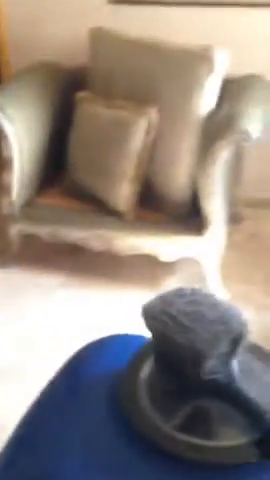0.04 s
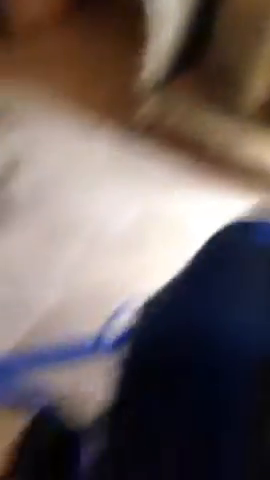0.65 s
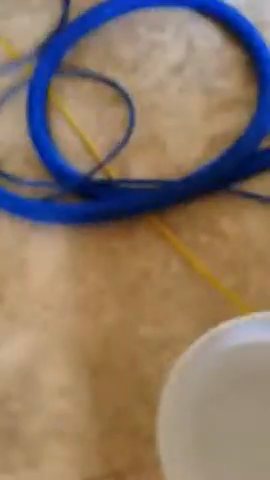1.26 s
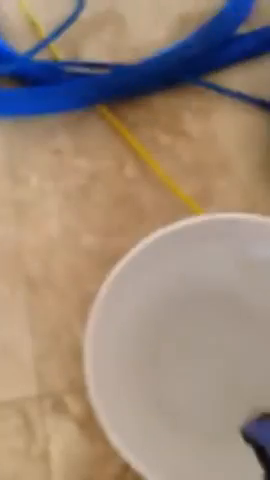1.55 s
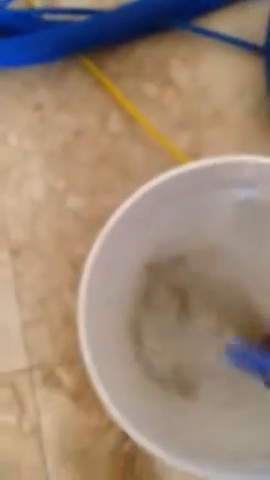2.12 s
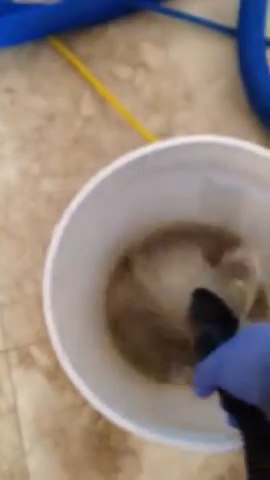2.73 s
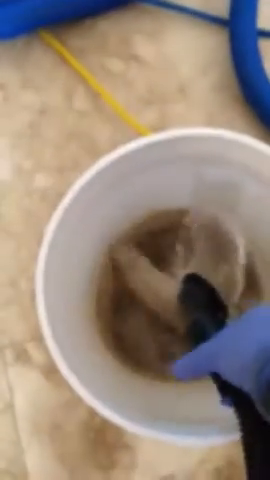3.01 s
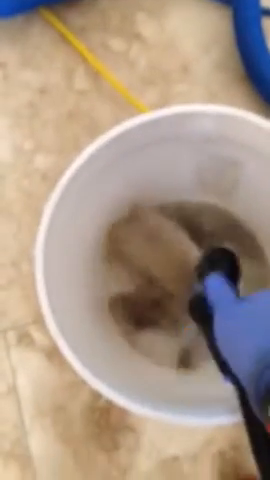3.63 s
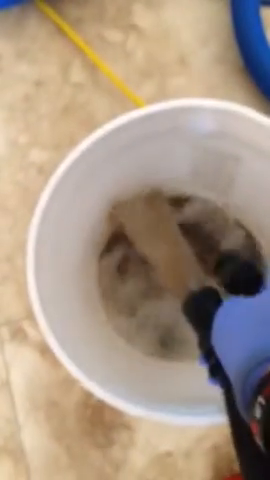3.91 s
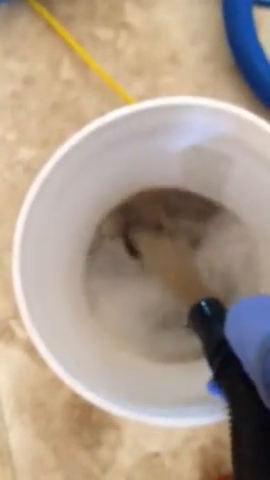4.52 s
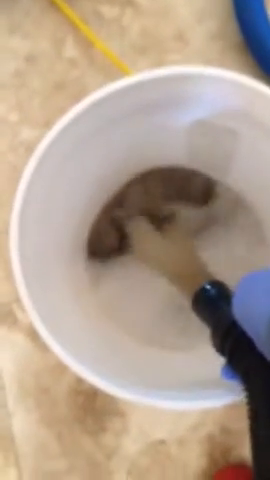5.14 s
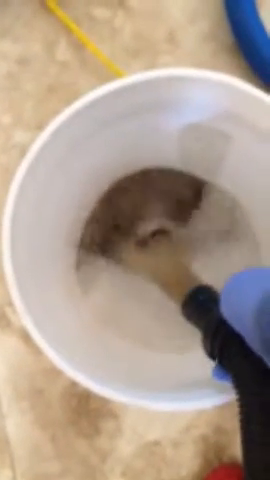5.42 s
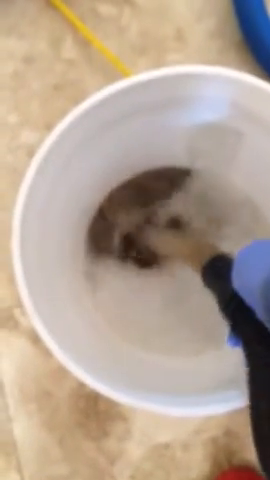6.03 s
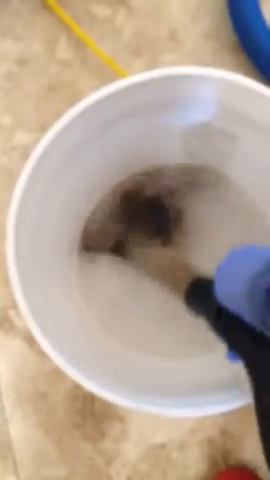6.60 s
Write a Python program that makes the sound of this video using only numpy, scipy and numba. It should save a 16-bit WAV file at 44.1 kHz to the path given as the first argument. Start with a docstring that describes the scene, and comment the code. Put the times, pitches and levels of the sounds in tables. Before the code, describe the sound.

Indoors, over a faint rumble and hiss, a hose rubs softly and swishes into place. It spits air and water, then gushes into an empty plastic bucket, spattering brightly and drumming on the bottom. As the water deepens, the spray softens into churning and gurgling, with sharp spits and hollow glugs that slowly rise in pitch. The sound is close, with a short room echo.

```python
"""Drain hose filling a bucket

A hose is swung over an empty plastic bucket on a hard floor indoors; it spits, then gushes.
The jet spatters on the plastic and later plunges into deepening water, where bubbles gurgle and
gulps of air boom in the bucket, whose note rises as it fills. Faint hiss and rumble lie under it."""
import sys
import numpy as np
from scipy import signal
from scipy.fft import rfft, irfft
from scipy.io import wavfile
from numba import njit

SR = 44100
rng = np.random.default_rng(int(sys.argv[2]) if len(sys.argv) > 2 else 0)


def to_wav(sig):
    """Store sig (one row per channel, or 1-D mono) as 16-bit WAV at the path in sys.argv[1].

    Samples outside -1..1 are clipped; the rate is SR.
    """
    pcm = np.clip(np.atleast_2d(sig), -1, 1) * 32767
    pcm = np.round(pcm).astype(np.int16)
    wavfile.write(sys.argv[1], SR, pcm.T)  # frames by channels


N = 298116
T = np.arange(N) / SR
FIRST_WATER_S, FLOW_S, FULL_FLOW_S = 1.98, 2.06, 2.24
COVERED_S, DEEP_S = 3.6, 4.33  # pool swallows the jet; pool churns fully

# Jet force: time_s, level_db
JET_FORCE = [(2.05, -44), (2.11, -21), (2.21, -28), (2.235, -17), (2.5, -21), (2.66, -19.5), (2.8, -19),
             (2.91, -19), (3.065, -19.5), (3.09, -22.5), (3.25, -25.5), (3.6, -27.5), (3.69, -27),
             (3.76, -29), (3.95, -26.5), (4.19, -24.5), (4.46, -27), (4.8, -24.5), (5.22, -28),
             (5.33, -26.5), (5.37, -32.5), (5.58, -29), (5.69, -35), (5.76, -28), (5.86, -32.5),
             (6.2, -29.5), (6.25, -34), (6.42, -33), (6.54, -33.5), (6.7, -28)]
# Jet breaking the surface: peak_s, decay_s, coarse_db, fine_db
SURFACE_SPLASHES = [(2.233, 0.016, -36, -21), (2.478, 0.0099, -29, -32), (2.677, 0.021, -24.5, -34),
                    (2.783, 0.07, -33, -20), (2.923, .03, -32, -35), (3.022, 0.045, -21.5, -19),
                    (3.155, .025, -36, -23), (3.293, .02, -28, -42), (3.394, 0.057, -29.5, -20.5),
                    (3.563, 0.047, -27, -23.5), (3.804, 0.04, -35, -21.5), (4.045, .025, -31, -34),
                    (4.122, .035, -51, -22.5), (4.3, .035, -31.5, -26), (4.446, 0.03, -28, -27),
                    (4.648, .025, -38, -36), (4.722, 0.033, -30.5, -40), (4.931, 0.021, -33, -26),
                    (5.011, .025, -29, -40), (5.07, 0.0097, -28, -28), (5.18, 0.0093, -44, -42),
                    (5.259, 0.016, -42, -22.5), (5.455, 0.013, -35, -24.5), (5.8, 0.012, -46, -30),
                    (5.912, 0.014, -38, -26), (6.014, 0.012, -30, -25.5), (6.122, 0.049, -48, -27),
                    (6.37, 0.03, -38.5, -46), (6.503, 0.014, -33.5, -35), (6.586, 0.034, -35, -25),
                    (6.715, 0.011, -30.5, -24)]
# Fine spray spectrum: freq_hz, gain_db
FINE_EQ = [(2400, -27), (3000, -13), (3500, -6), (4700, -5), (6400, -5), (8000, -3), (10500, -0.5),
           (12500, -5), (14000, -10), (15500, -15.5)]
# Coarse splash spectrum: freq_hz, gain_db
COARSE_EQ = [(900, -3), (1500, -6), (2200, -3), (3000, -1.5), (4200, 3), (6000, -3), (9000, -13)]


def spatter(surge_db, usual_jet_db=-25.5, puff_s=1.812):
    """The jet breaks into dense spray, sharp ticks and bursting foam; coarser splashes ring lower."""
    spray = drops(count=22000, spread_db=4, smear_s=.0053)
    ticks = drops(count=900, spread_db=2.5, smear_s=.00041)
    foam = grains(count=13000, low_hz=2815, high_hz=15270, cycles=30, spread_db=4, glide=.07)
    fine = spray + undb(-14) * ticks + undb(-7) * foam + undb(-6) * droplet_bunches()
    fine = unit(colour(fine, FINE_EQ))
    beads = grains(count=6000, low_hz=1497, high_hz=7000, cycles=55, spread_db=2.8, glide=.05)
    coarse = unit(colour(beads + spray, COARSE_EQ))
    coarse += undb(-8) * depth() * unit(cavity(coarse))
    force_db = curve(JET_FORCE)
    coarse_db = -37.5 + .93 * (force_db - usual_jet_db) + 1.15 * walk(14)
    fine_gain = ramp(FIRST_WATER_S - .01, FIRST_WATER_S) * undb(force_db)
    coarse_gain = ramp(FLOW_S, FULL_FLOW_S) * undb(coarse_db)
    for peak_s, decay_s, splash_db, spray_db in SURFACE_SPLASHES:
        splash = swell(T - peak_s, .4 * decay_s, decay_s)
        coarse_gain = np.hypot(coarse_gain, undb(splash_db) * splash)
        fine_gain = np.hypot(fine_gain, undb(spray_db) * splash)
    # air and mist escape ahead of the water
    puff = undb(-43) * swell(T - puff_s, .037, .079) * (fine + undb(-16) * coarse)
    return undb(.78 * surge_db) * (fine_gain * fine + coarse_gain * coarse) + puff


def droplet_bunches(centre_hz=6200, scatter_octaves=.7, width_hz=1800.):
    """Droplets of like size land in brief bunches, each with its own pitch."""
    pitch_hz = np.clip(centre_hz * 2 ** (scatter_octaves * walk(55)), 2800, 13000)
    bunch_gain = undb(2.5 * np.clip(walk(70), -2, 2))
    impacts = drops(count=9000, spread_db=4, smear_s=.00071)
    return unit(bunch_gain * resonate(impacts, pitch_hz, width_hz))


# Nozzle bursts: peak_s, relative_peak_db, centre_hz, shower_re_crack_db
NOZZLE_SPITS = [(1.8052, -9, 10440, -15), (1.8452, -15, 9300, -14), (1.975, -25, 4500, -9),
                (2.013, -19, 9800, -17), (2.0338, -11, 11300, -11), (2.0865, -2.5, 10000, -21),
                (2.1014, 0.5, 10400, -9), (2.1315, -3.5, 7900, 8), (2.228, -2.5, 8300, 12),
                (2.252, 1, 6000, -4), (2.3906, 3, 8500, -16), (2.638, 0, 11400, -22),
                (2.682, -4.5, 4460, -5), (2.8706, 3.5, 8670, -11), (3.063, 3, 9000, -21),
                (3.104, -4, 6600, 2), (3.223, -5, 9100, -15), (3.258, -2, 9700, -14),
                (3.522, -5, 7300, -13), (3.556, -3.5, 7850, -16), (3.631, -1.5, 8800, -24),
                (3.719, 0, 10900, -13), (3.7787, -7, 5000, 5), (3.909, -7.5, 5400, -14),
                (3.991, -10, 10000, -22), (4.049, -5, 10000, -20), (4.166, -3, 9100, -24),
                (4.183, -2, 9000, -19), (4.619, -4, 9200, -15), (4.659, -1, 9400, -25),
                (4.858, -2, 7800, -31), (4.869, -16, 9000, -26), (4.984, 5, 8900, -23),
                (5.072, -12, 7460, -21), (5.104, -4.5, 8000, -18), (5.19, -7, 10000, -24),
                (5.3253, -2, 7250, -14), (5.3422, -3.5, 8200, -23), (5.434, -9, 8700, -18),
                (5.523, -7, 6100, -15), (5.6312, -9, 9100, -32), (5.7112, -7.5, 10900, -21),
                (5.7256, -6, 10600, -18), (5.7973, -1, 9900, -8), (6.2175, -1.5, 9600, -21),
                (6.5622, -7, 10100, -22), (6.589, -9, 6000, -14), (6.725, -9, 9000, -19)]


def spits(gain_db=-3.5, lead_s=.02, width_hz=6500):
    """Air pockets burst at the nozzle: a quick swell, a crack and a short shower of droplets."""
    out, t = np.zeros(N), T[:SR // 10] - lead_s
    crack, shower = swell(t, .0004, .0008), swell(t, .003, .008)
    for peak_s, level_db, centre_hz, shower_db in NOZZLE_SPITS:
        burst = rng.standard_normal(len(t)) * (crack + undb(shower_db) * shower)
        burst = body(burst, [(centre_hz, width_hz, 0)])
        burst = colour(burst, [(1500, -11.5), (3500, -3.5), (12000, -1.5), (15500, -6.5)])
        add(out, peak_s - lead_s, peak(burst, level_db + gain_db))
    return out


# Deep-water churn: time_s, level_db
CHURN_LEVEL = [(3.6, -62), (3.69, -49.5), (3.8, -43.5), (4.13, -48), (4.3, -37.5), (4.45, -38.5),
               (4.52, -41), (4.8, -39), (4.94, -38.5), (5.05, -43), (5.3, -41.5), (5.4, -45), (5.68, -43),
               (5.78, -41.5), (6.15, -43), (6.28, -48.5), (6.45, -47.5), (6.6, -44)]
# Thin-film slap spectrum: freq_hz, gain_db
SLAP_EQ = [(290, -5.5), (450, 2), (640, 11.5), (780, 8), (950, 6.5), (1250, 14), (1700, 6.5), (2200, 9.5)]
# Deep bubble spectrum: freq_hz, gain_db
BUBBLE_EQ = [(290, -17.5), (380, -8.5), (500, -19.5), (680, 0.5), (950, -5.5), (1230, 0), (1500, -3),
             (1850, -12), (2300, -15)]


def gurgle(surge_db, cover_time_s=.062, slap_rise_db_per_s=.9):
    """Short slaps on a thin film give way to bubbles and a hollow wash as the water deepens."""
    slaps = grains(count=5000, low_hz=268, high_hz=2530, cycles=23.5, spread_db=-1, glide=.052)
    slaps = unit(colour(slaps, SLAP_EQ))
    bubbles = grains(count=5000, low_hz=295, high_hz=2320, cycles=38, spread_db=2.9, glide=.24)
    bubbles = unit(colour(bubbles, BUBBLE_EQ))
    wash = unit(cavity(drops(count=9000, spread_db=2.5, smear_s=.00094)))
    covered = ramp(COVERED_S, COVERED_S + cover_time_s)
    slap_db = -43.5 + slap_rise_db_per_s * since(FLOW_S) + .97 * walk(18)
    shallow = np.sqrt(ramp(FIRST_WATER_S, FULL_FLOW_S)) * (1 - covered) * undb(slap_db) * slaps
    deep = covered * undb(curve(CHURN_LEVEL)) * (undb(-.5) * bubbles + undb(-2) * wash)
    return undb(2 * surge_db) * colour(shallow + deep, [(250, 0), (4000, 0)])


# Air modes above the pool: freq_hz, width_hz, gain_db
AIR_MODES = [(290, 45, -20), (400, 150, -2.5), (677, 110, 1.5), (870, 79, -14), (1080, 130, 0),
             (1202, 30, 10.5), (1254, 64, 5), (1466, 170, -3.5), (1950, 97, -2)]


def cavity(x, climb_per_s=.014, heave_ratio=.013):
    """The air above the pool rings; its modes shift as the surface heaves and climb as it rises."""
    climb = 1 + climb_per_s * since(DEEP_S)
    return sum(undb(db) * resonate(x, hz * climb * (1 + heave_ratio * walk(16)), float(width_hz))
               for hz, width_hz, db in AIR_MODES)


def boom(surge_db, empty_hz=209.6, rise_hz_per_s=11.6, cushion_db_per_s=-15):
    """The jet drums on the bare bottom until water cushions it; glugs keep the hollow note going."""
    note_hz = (empty_hz + rise_hz_per_s * since(COVERED_S)) * (1 + .03 * walk(20))
    push_gain = undb(2 * walk(24))
    push = push_gain * grains(count=2500, low_hz=97, high_hz=410, cycles=4.5, spread_db=1.5, glide=0)
    drum = unit(resonate(resonate(push, note_hz, 62.), note_hz, 150.))
    glug = unit(resonate(resonate(push, note_hz, 48.), note_hz, 150.))
    drum_gain = ramp(FIRST_WATER_S, FLOW_S) * undb(-42 + cushion_db_per_s * since(FLOW_S))
    glug_gain = ramp(FLOW_S, COVERED_S) * undb(-46 - 5.5 * (1.5 - depth() ** 4))
    return undb(.5 * surge_db) * (drum_gain * drum + glug_gain * glug)


# Slugs hitting the bucket: start_s, length_s, pitch_hz, note_db, thud_db, knock_db
WATER_SLUGS = [(1.821, 0.062, 213.5, -32.5, -58, -35.5), (1.845, 0.017, 210, -38, -46, -32.5),
               (1.889, .005, 215, -35, -38, -35), (1.973, .006, 212, -67, -48, -30),
               (1.999, 0.023, 205, -30.5, -45, -31.5), (2.034, 0.039, 210, -25.5, -44, -41),
               (2.062, 0.015, 212, -46, -44, -24.5), (2.089, 0.015, 214, -25, -34.5, -28),
               (2.147, .012, 209, -37, -42, -35), (2.194, 0.011, 200, -27.5, -55, -51),
               (2.226, 0.028, 248, -44, -55, -30), (2.305, .028, 212, -28.5, -56, -28.5),
               (2.385, 0.025, 207, -28, -58, -31), (2.472, 0.022, 214, -32, -52, -34),
               (2.548, 0.014, 235, -37, -43, -31), (2.59, 0.061, 205.4, -31.5, -44, -34),
               (2.69, .08, 206, -34.5, -44, -45), (2.857, 0.025, 212, -34.5, -49, -43),
               (3.174, 0.047, 216, -33.5, -55, -51), (4.175, 0.018, 222, -38, -60, -25.5),
               (4.318, 0.015, 226, -31.5, -31.5, -35), (4.424, 0.025, 217, -31.5, -33, -38),
               (4.585, 0.0073, 223, -25.5, -42, -26.5), (4.655, .014, 226, -40, -44, -29),
               (4.691, 0.018, 218, -30.5, -47, -30), (4.775, 0.019, 233, -33, -43, -42),
               (4.836, 0.03, 221, -27, -35.5, -34), (5.031, 0.043, 232, -29.5, -36, -45),
               (5.098, 0.0096, 250, -33.5, -36, -33), (5.158, 0.051, 234, -33.5, -38, -28.5),
               (5.247, .025, 235, -31.5, -34, -31), (5.325, .012, 239, -37, -46, -38),
               (5.368, 0.011, 242, -38, -52, -52), (5.428, .018, 245, -34, -39, -34),
               (5.53, 0.037, 255, -33.5, -36, -47), (5.721, 0.017, 226, -31, -41, -31),
               (5.792, 0.0073, 267, -27.5, -31.5, -27.5), (5.866, 0.0085, 234, -28, -34.5, -35),
               (5.898, 0.02, 250, -32.5, -55, -36), (6.008, 0.011, 229, -32.5, -43, -41),
               (6.1, .012, 245, -35, -55, -41), (6.133, 0.009, 248, -32, -53, -38),
               (6.181, 0.017, 246, -28, -45, -31), (6.29, 0.054, 242, -34, -43, -36),
               (6.35, .02, 227.5, -41, -47, -35), (6.579, 0.013, 243, -29, -34.5, -34),
               (6.662, 0.018, 241, -34.5, -45, -42), (6.716, 0.011, 247, -42.5, -50, -38)]
# Plastic wall modes: freq_hz, width_hz, gain_db
WALL_MODES = [(735, 170, 8), (900, 200, 1), (1240, 130, -4), (1810, 200, -9), (2130, 150, -5)]


def slugs(attack_s=.0029, release_s=.0105, roughness=.3):
    """Each slug of water drives a rough hollow note, thuds into the pool and knocks on the plastic."""
    out, t = np.zeros(N), T[:SR // 4]
    for start_s, length_s, hz, note_db, thud_db, knock_db in WATER_SLUGS:
        waver = 1 + .04 * walk(90)[:len(t)]
        tone = np.sin(2 * np.pi * np.cumsum(hz * waver) / SR)
        envelope = (1 - np.exp(-t / attack_s)) * np.exp(-np.maximum(t - length_s, 0) / release_s)
        flutter = undb(2 * walk(110)[:len(t)])
        rattle = unit(colour(rng.standard_normal(len(t)), [(.8 * hz, -4), (hz, 0), (1.15 * hz, -5)]))
        note = (tone + roughness * rattle) * envelope * flutter
        blow = rng.standard_normal(len(t)) * np.exp(-t / (.006 + .64 * length_s))
        thud = colour(blow, [(160, -8.5), (220, -17), (300, -6), (370, 3), (480, -12.5), (620, -13.5)])
        wall = body(blow, WALL_MODES, pitch_ratio=1 + .05 * rng.standard_normal())
        knock = colour(wall, [(500, 0), (3000, 0)])
        add(out, start_s, peak(note, note_db) + peak(thud, thud_db) + peak(knock, knock_db))
    return out


# Single large bubbles: start_s, relative_peak_db, pitch_hz
LARGE_BUBBLES = [(1.831, -36, 2130), (2.032, -35, 3270), (2.2995, -11.5, 3420), (2.566, -21, 1960),
                 (2.86, -15, 2580), (3.045, -19, 2860), (3.29, -20.5, 2040), (3.292, -17.5, 2660),
                 (3.563, -19, 3020), (3.581, -20.5, 2260), (3.773, -10.5, 4900), (3.779, -15, 3660),
                 (3.832, -17.5, 3240), (3.883, -23.5, 1510), (3.986, -24.5, 1215), (4.125, -13.5, 4130),
                 (4.263, -23, 1500), (4.39, -11.5, 3860), (4.43, -21.5, 1210), (4.714, -21, 2670),
                 (4.93, -23, 1218), (5.186, -24, 1196), (5.26, -21, 1245), (5.926, -25.5, 1290)]


def plops(cycles=65., gain_db=-2):
    """Large bubbles ring out above the churning."""
    start_s, level_db, pitch_hz = np.array(LARGE_BUBBLES, float).T.copy()
    return ring(start_s, pitch_hz, np.full(len(start_s), cycles), undb(level_db + gain_db), glide=.11)


# Swung hose spectrum: freq_hz, gain_db
SWISH_EQ = [(900, -14), (1600, -10), (2100, -13), (3500, -4.5), (5300, -5), (6600, 5), (8500, 5),
            (11000, 7.5), (15500, -10)]


def hose_swish(swing_s=1.46, settle_s=1.525):
    """The hose swishes into place, led by a thin hiss and duller as it settles."""
    rub = unit(colour(drops(count=30000, spread_db=2, smear_s=.0015), SWISH_EQ))
    dull = noise([(1500, -23), (3500, 2), (7500, 2), (12000, -2)])
    thin = noise([(9000, -14), (10500, -2), (11700, 3), (13000, -3), (15000, -10)])
    return (undb(-32.5) * swell(T - swing_s, .05, .038) * rub
            + undb(-41) * swell(T - swing_s, .097, .033) * thin
            + undb(-44.5) * swell(T - settle_s, .034, .043) * dull)


# Hose rubs: peak_s, level_db, pitch_ratio
HOSE_RUBS = [(.24, -68.5, 0.88), (.42, -68, 0.99), (.595, -56, 1.0), (.97, -64, 0.81)]
# Rubbed hose modes: freq_hz, width_hz, gain_db
HOSE_MODES = [(735, 70, 1), (1670, 160, -6), (2040, 140, -13), (2390, 160, -11), (3440, 200, -14),
              (4870, 600, -16)]


def hose_scrapes(rise_s=.028, fall_s=.07):
    """The ribbed hose rubs faintly as it is picked up."""
    friction = drops(count=6000, spread_db=3.5, smear_s=.00053)
    return sum(undb(db) * swell(T - peak_s, rise_s, fall_s) * unit(body(friction, HOSE_MODES, ratio))
               for peak_s, db, ratio in HOSE_RUBS)


# Low rumble: time_s, level_db
RUMBLE_LEVEL = [(.8, -56), (.95, -57), (1.5, -57), (2.5, -51.5), (3.4, -64.5), (5, -56)]
# Rumble spectrum: freq_hz, gain_db
RUMBLE_EQ = [(25, -19), (42, -10), (58, 2), (75, 0), (110, 0), (200, 3.5), (300, -4), (450, -7.5),
             (750, -10.5), (1000, -14.5), (1700, -18), (3000, -24.5)]
# Hiss spectrum: freq_hz, gain_db
HISS_EQ = [(2500, -13), (3500, -3), (6000, -3.5), (6700, 4.5), (8200, 4), (9000, -1.5), (12000, -2.5),
           (15000, -8)]


def background(hiss_db=-61):
    """Low rumble and a thin steady hiss."""
    rumble = noise(RUMBLE_EQ) * undb(curve(RUMBLE_LEVEL))
    hiss = noise(HISS_EQ) * undb(hiss_db + .1 * walk(12))
    return rumble + hiss


def room(x, t60_s=.48, wet_db=-14.5, predelay_s=.004):
    """A furnished room answers with a short, slightly dull tail."""
    t = T[:SR // 2]
    tail = rng.standard_normal(len(t)) * undb(-60 * t / t60_s) * (t > predelay_s)
    tail = colour(tail, [(200, -6), (600, -8), (3000, -12), (15000, -10)])
    return x + undb(wet_db) * signal.fftconvolve(x, tail / np.linalg.norm(tail))[:N]


def drops(count, spread_db, smear_s):
    """Dense impacts, many weak and few strong, each smeared into a brief noise burst."""
    when, luck = rng.random((count, 2)).T
    size = undb(-spread_db * np.log(1 - .996 * luck))
    energy = np.bincount((when * N).astype(int), size ** 2, N)
    energy = signal.lfilter([1], [1, -np.exp(-2 / (smear_s * SR))], energy)
    return unit(np.sqrt(energy) * rng.standard_normal(N))


def grains(count, low_hz, high_hz, cycles, spread_db, glide):
    """A cloud of ringing bubbles of random strength, spectrally flat between its edges."""
    when, pitch, life, luck = rng.random((count, 4)).T
    hz = low_hz * (high_hz / low_hz) ** pitch
    size = undb(-spread_db * np.log(1 - .99 * luck)) * hz
    return unit(ring(when * N / SR, hz, cycles * (.5 + life), size, float(glide)))


@njit
def ring(start_s, hz, cycles, size, glide):
    """Damped sines that fall 60 dB over their cycles while pitch rises by the fraction glide."""
    out = np.zeros(N)
    for k in range(len(start_s)):
        start, length = int(start_s[k] * SR), int(cycles[k] / hz[k] * SR) + 2
        phasor = size[k] + 0j
        step = np.exp(2j * np.pi * hz[k] / SR - 6.9 / length)
        bend = np.exp(2j * np.pi * hz[k] / SR * glide / length)
        for i in range(start, min(start + length, N)):
            phasor *= step
            step *= bend
            out[i] += phasor.imag
    return out


@njit
def resonate(x, hz, width_hz):
    """State-variable band-pass with a moving centre."""
    out, band_state, low_state = np.empty(len(x)), 0., 0.
    for i in range(len(x)):
        g, damping = np.tan(np.pi * hz[i] / SR), width_hz / hz[i]
        band = (band_state + g * (x[i] - low_state) + 1e-18) / (1 + g * (g + damping))
        band_state = 2 * band - band_state
        low_state += 2 * g * band
        out[i] = damping * band
    return out


def body(x, modes, pitch_ratio=1):
    """Parallel resonances, shifted together in pitch."""
    return sum(undb(db) * resonate(x, np.full(len(x), float(hz * pitch_ratio)), float(width_hz))
               for hz, width_hz, db in modes)


def colour(x, points, size=8192):
    """Minimum-phase filter through (freq_hz, gain_db) points, 40 dB per octave down outside them."""
    hz, db = np.transpose(points)
    octave = np.log2(np.maximum(np.arange(size // 2 + 1), 1) * SR / size)
    outside = np.abs(octave - np.clip(octave, np.log2(hz[0]), np.log2(hz[-1])))
    gain_db = np.interp(octave, np.log2(hz), db) - np.minimum(40 * outside, 70)
    cepstrum = irfft(np.log(undb(gain_db)))
    cepstrum[1:size // 2] *= 2
    cepstrum[size // 2 + 1:] = 0
    return signal.fftconvolve(x, irfft(np.exp(rfft(cepstrum))))[:len(x)]


def noise(points):
    """Coloured noise at rms 1."""
    return unit(colour(rng.standard_normal(N), points))


def walk(rate_hz):
    """Smooth random wander, spread near 1."""
    steps = rng.standard_normal(8192)
    return np.sqrt(3 / 2) * np.interp(T * rate_hz, np.arange(len(steps)), steps)


def depth():
    """Jet plunge: 0 on a thin film, 1 in deep water."""
    return ramp(COVERED_S, DEEP_S)


def ramp(start_s, end_s):
    """Linear rise from 0 to 1."""
    return np.clip((T - start_s) / (end_s - start_s), 0, 1)


def since(start_s):
    """Seconds elapsed, 0 before the start."""
    return np.maximum(T - start_s, 0)


def swell(t, rise_s, fall_s):
    """Exponential rise to 1 at t = 0, then exponential fall."""
    return np.exp(-np.abs(t) / np.where(t < 0, rise_s, fall_s))


def curve(table):
    """Straight lines through (time_s, value) rows."""
    return np.interp(T, *np.transpose(table))


def add(track, start_s, sound):
    """Mix a sound in at a time."""
    i = int(start_s * SR)
    track[i:i + len(sound)] += sound[:N - i]


def undb(db):
    """Decibels to gain."""
    return 10 ** (np.asarray(db) / 20)


def unit(x):
    """Scale to rms 1."""
    return x / np.sqrt(np.mean(x ** 2))


def peak(x, db):
    """Scale to a peak level."""
    return x * undb(db) / np.abs(x).max()


def scene():
    """One uneven flow drives spatter, gurgle and boom together; water and hose sound in the room."""
    surge_db = .25 * walk(22) + walk(65) + .95 * walk(150)
    water = spatter(surge_db) + gurgle(surge_db) + boom(surge_db) + slugs() + spits() + plops()
    return (room(water + hose_scrapes() + hose_swish()) + background())[None]


def record(dry, cutoff_hz=15500):
    """Soft clipping rounds the highest peaks; a steep low-pass cuts the top."""
    lowpass = signal.ellip(10, .2, 75, cutoff_hz, fs=SR, output="sos")
    return signal.sosfilt(lowpass, np.tanh(dry))


dry = scene()
out = record(dry)
to_wav(out)
```